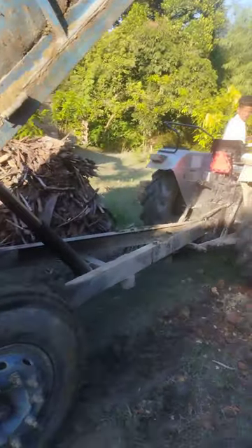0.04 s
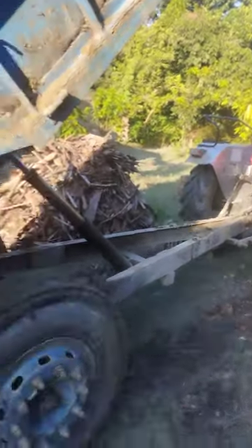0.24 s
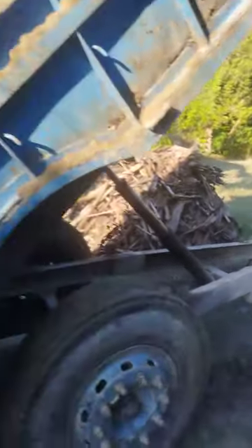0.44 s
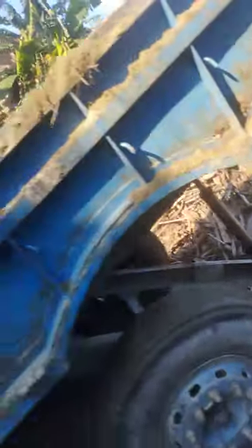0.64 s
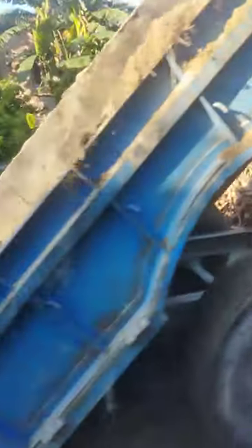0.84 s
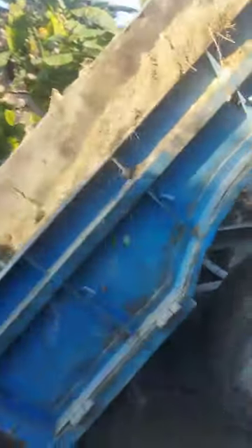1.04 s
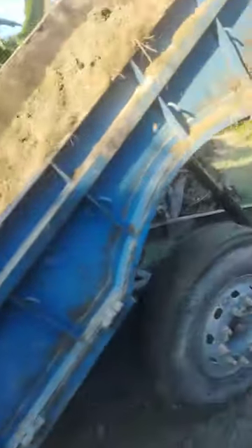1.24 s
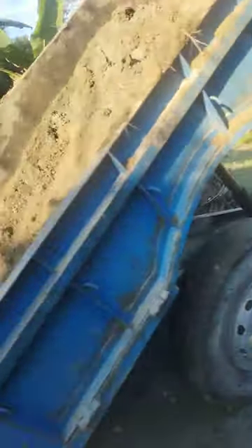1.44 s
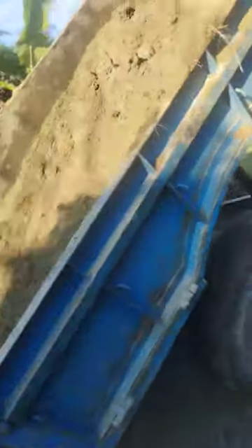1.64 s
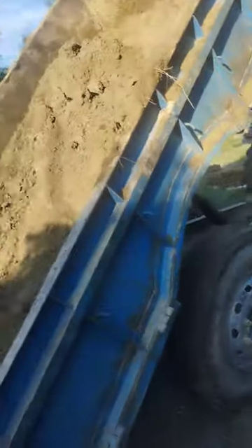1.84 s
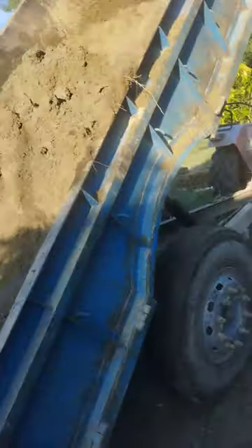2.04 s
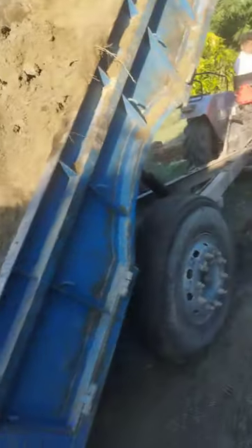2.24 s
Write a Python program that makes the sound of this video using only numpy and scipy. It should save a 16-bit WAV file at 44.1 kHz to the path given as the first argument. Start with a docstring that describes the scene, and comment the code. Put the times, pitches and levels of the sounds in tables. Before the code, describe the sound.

Soil slides down a tipped steel trailer, close by outdoors. Wind buffets the microphone at 0.3 and 0.5 seconds. At 0.6 the load lets go with a thud and a gritty rumble, clods thumping the bed until about 1.2. The steel groans briefly near 1.1. A faint trickle follows, with a short scrape around 1.9, while a diesel tractor chugs from 0.7 and slows toward the end at 2.4.

```python
"""Outdoors, close to a tipped steel trailer, with the microphone open to the wind.
Air buffets the microphone twice; then the load of soil lets go with a thud and a gritty rush,
and clods burst on the ringing bed. The steel body groans under the moving mass.
A trickle of earth and one short scrape remain over the chug of the tractor's diesel,
which slows as it winds down to idle."""
import sys
import numpy as np
from scipy import signal
from scipy.fft import rfft, irfft
from scipy.io import wavfile

SR = 44100
rng = np.random.default_rng(int(sys.argv[2]) if len(sys.argv) > 2 else 0)


def wav_record(signal):
    """Record a signal, one row per channel, as 16-bit PCM in the file named by sys.argv[1]."""
    frames = np.transpose(np.atleast_2d(signal))
    bounded = np.clip(frames, -1, 1)
    # unit amplitude maps onto the largest positive 16-bit level
    quanta = np.round(bounded * 32767).astype(np.int16)
    wavfile.write(sys.argv[1], SR, quanta)


N = 105840
T = np.arange(N) / SR


def amp(db):
    """Decibels to gain."""
    return 10 ** (np.asarray(db) / 20)


def unit(x):
    """Scales to rms 1."""
    return x / np.sqrt(np.mean(x ** 2) + 1e-20)


def level(rows, column=1):
    """Gain over time from rows that hold a time in seconds, then levels in dB."""
    rows = np.array(rows)
    return amp(np.interp(T, rows[:, 0], rows[:, column]))


def colour(x, spectrum):
    """Filters x by rows of frequency in Hz and gain in dB; comes out at rms 1."""
    hz, db = np.transpose(spectrum)
    gain = amp(np.interp(np.log(np.fft.rfftfreq(N, 1 / SR) + 1), np.log(hz + 1), db))
    return unit(irfft(rfft(x) * gain, N))


def noise(spectrum):
    """Smooth noise with the given spectrum."""
    return colour(rng.standard_normal(N), spectrum)


def drift(rate_hz):
    """Random motion mostly slower than rate_hz, at rms 1."""
    lowpass = np.exp(-(np.fft.rfftfreq(N, 1 / SR) / rate_hz) ** 2)
    return unit(irfft(rfft(rng.standard_normal(N)) * lowpass, N))


def grains(spectrum, per_s, spread_db):
    """Countless small impacts of uneven size."""
    size = amp(spread_db * np.minimum(rng.exponential(1, N), 4)) * rng.choice([-1, 1], N)
    return colour(size * (rng.random(N) < per_s / SR), spectrum)


def tone(hz):
    """A sine that follows a moving pitch."""
    return np.sin(2 * np.pi * np.cumsum(hz) / SR)


def bell(at, width):
    """A smooth swell around a moment; width is its half length in seconds."""
    return np.exp(-((T - at) / width) ** 2)


def blow(at, rise, decay):
    """A quick rise and an exponential fall, all times in seconds."""
    return np.clip((T - at) / rise + .5, 0, 1) * np.exp(-np.maximum(T - at - rise, 0) / decay)


def ambience():
    """Quiet outdoor air with faint wavering machine tones."""
    # Open air. Each row: frequency in Hz, relative level in dB.
    air_spectrum = [(120, -32), (200, 3.5), (236, -4.5), (408, -7), (832, -12.5), (964, -22), (1080, -19),
                    (1440, -14.5), (2730, -24), (15800, -27)]
    # Machine tones. Each row: pitch in Hz, level in dB.
    hum_tones = [(440, -77), (975, -79), (1480, -79.5)]
    hums = sum(amp(db) * tone(hz * (1 + .03 * drift(rate_hz=150))) for hz, db in hum_tones)
    return amp(-66) * noise(air_spectrum) + hums


def wind():
    """Air on the microphone: slow swells, and buffets of suction, flutter, rebound and backwash."""
    # Swells, flutter and overload crackle. Each row: frequency in Hz, relative level in dB.
    swell_spectrum = [(3, -17.5), (9, 5), (20, -4), (40, -13), (80, -31.5), (160, -47.5), (400, -71.5),
                      (1500, -80.5), (16000, -105)]
    flutter_spectrum = [(30, -1), (150, 2), (260, 5), (400, -2), (600, -6.5), (800, -21), (1000, -19.5),
                        (1500, -24), (3000, -42.5), (7000, -53), (16000, -49.5)]
    crackle_spectrum = [(100, -8.5), (250, 4.5), (500, 8.5), (1200, -2), (2000, -22.5), (4000, -30.5),
                        (8000, -39.5), (16000, -44.5)]
    # Wind strength. Each row: time in seconds, level in dB.
    swell_level = [(0, -23), (.15, -27), (.28, -18.5), (.4, -20.5), (.49, -16.5), (.58, -23), (.9, -34),
                   (1.1, -50.5), (2.4, -40)]
    # Each row: time in seconds, suction in dB, its half width in seconds, rebound in dB,
    # its length in seconds, flutter in dB, backwash in dB.
    buffets = [(0.3155, 0.1, .002, -1.5, 0.045, -21, -9), (0.5362, 3, 0.00342, -2.5, 0.032, -32, -23)]
    # The microphone crackles as it overloads. Each row: time in seconds, level in dB.
    crackles = [(0.3202, -38.5), (.533, -27.5), (0.5369, -28), (0.544, -24.5)]
    rebound_delay_s = 0.0035
    out = noise(swell_spectrum) * level(swell_level)
    flutter = noise(flutter_spectrum)
    for at, suction_db, width, rebound_db, length, flutter_db, backwash_db in buffets:
        out *= 1 - bell(at + length / 2, length)  # the swells give way to the buffet
        out -= amp(suction_db) / (1 + ((T - at) / width) ** 2)
        rebound_at = at + rebound_delay_s + length / 2
        out += amp(rebound_db) * np.exp(-abs((T - rebound_at) / (0.372 * length)) ** 3)
        out -= amp(backwash_db) * bell(at + 2 * length, 0.9 * length)
        out += amp(flutter_db) * flutter * blow(at, rise=0.0029, decay=0.0093)
    return out + noise(crackle_spectrum) * sum(amp(db) * bell(at, 0.0015) for at, db in crackles)


def thuds():
    """Heavy lumps and smaller puffs give low, heavily damped thumps."""
    # Each row: time in seconds, peak in dB, pitch in Hz, half length in seconds.
    thumps = [(0.487, -8.5, 54.2, 0.0072), (0.508, -9.5, 30, 0.0096), (0.6528, -1.5, 128, 0.0048),
              (0.693, -13, 83.6, 0.0053), (0.726, -7, 120, 0.0029), (0.774, -18.5, 49, 0.02),
              (0.811, -9, 70, 0.01), (0.863, -14.5, 55, 0.0056), (0.908, -12, 50.5, .011),
              (.954, -14, 55, .012), (1.042, -16.5, 86, 0.014), (1.176, -17.5, 75.6, 0.0063)]
    return sum(amp(db) * bell(at, length) * np.cos(2 * np.pi * hz * (T - at))
               for at, db, hz, length in thumps)


def steel(x):
    """The bed's panel modes colour whatever rubs or strikes it; comes out at rms 1."""
    # Each row: mode frequency in Hz, gain in dB.
    panel_modes = [(189, 6), (376, 4.5), (452, 4.5), (646, 6), (717, 5), (819, 5.5), (956, 9.5), (1160, 0),
                   (1294, 5), (1421, 5.5), (1520, 0), (1750, 6.5), (1897, 10), (2007, -0.5)]
    width_hz = 11
    hz = np.fft.rfftfreq(N, 1 / SR)
    ring = 1 + sum((amp(db) - 1) / (1 + 2j * (hz - mode_hz) / width_hz) for mode_hz, db in panel_modes)
    return unit(irfft(rfft(x) * ring, N))


def soil():
    """The mass creeps, then heaves and rumbles on the bed while grains rush over it in clumps."""
    # The layers of the slide. Each row: frequency in Hz, relative level in dB.
    creep_spectrum = [(60, -8), (130, 4.5), (250, 0.5), (400, -10.5), (1000, -20.5), (2000, -34.5),
                      (5000, -50.5), (16000, -84.5)]
    heave_spectrum = [(15, -34.5), (30, -7), (41, 0.5), (58, -8), (80, -9), (110, -23.5), (300, -56),
                      (2000, -100)]
    rumble_spectrum = [(20, -22), (40, -9), (80, -3), (125, 4), (170, -7), (220, -10.5), (300, -16),
                       (450, -26.5), (900, -67)]
    rush_spectrum = [(120, -28), (200, -3.5), (258, -3), (296, -9), (362, -4), (507, -8.5), (1090, -16),
                     (1340, -17), (2290, -24.5), (3080, -40.5), (4250, -51.5), (5000, -69), (6500, -88),
                     (11000, -120)]
    grit_spectrum = [(800, -38), (2000, 1), (3000, -2.5), (4200, -7), (5200, -17), (8000, -20.5),
                     (12000, -22.5), (16000, -14)]
    # The sliding load. Each row: time in seconds, then relative levels of rumble, rush and grit in dB.
    slide = [(0.6, -34, -52, -82.5), (0.608, -35, -55.5, -82), (0.648, -17, -30, -41),
             (0.752, -23, -32.5, -56.5), (0.88, -30.5, -35, -53), (1.014, -24.5, -34.5, -57.5),
             (1.142, -37.5, -42.5, -64), (1.176, -32.5, -38, -55.5), (1.21, -39.5, -44.5, -60),
             (1.812, -48, -47.5, -64.5), (1.862, -42.5, -46.5, -61.5), (1.92, -47, -47.5, -67.5),
             (2.226, -44.5, -50, -68), (2.37, -59, -50, -68)]
    # The rumble thins once the heavy mass has left. Each row: time in seconds, gain in dB.
    emptying = [(.95, -4), (1.15, -1.5), (1.5, -3.5), (2.4, -7.5)]
    clumps = drift(rate_hz=70)
    heave = noise(heave_spectrum) * amp(-20.5) * bell(at=0.796, width=0.19)
    rumble = noise(rumble_spectrum) * level(slide, column=1) * level(emptying) * amp(3)
    rush = steel(grains(rush_spectrum, per_s=5000, spread_db=3))
    rush *= level(slide, column=2) * amp(1.7 * clumps)
    grit = grains(grit_spectrum, per_s=5000, spread_db=3)
    grit *= level(slide, column=3) * amp(-1 + 0.63 * clumps)
    creep = steel(noise(creep_spectrum)) * amp(-41) * bell(at=0.551, width=0.084)
    release_s, rise_s = .62, 0.0031
    release = np.clip((T - release_s) / rise_s, 0, 1)
    return creep + (heave + rumble + rush + grit) * release


def clods():
    """Clods and stones strike the steel and throw a spray of crumbs."""
    # Each row: start in seconds, level in dB, decay in seconds, spray level in dB.
    strikes = [(0.625, -50, .01, -72), (0.65, -33.5, 0.0052, -43), (.714, -35, 0.017, -56.5),
               (.762, -35, 0.01, -53.5), (.811, -28.5, .011, -56), (.857, -36, 0.033, -57),
               (0.902, -35, 0.013, -56), (0.938, -26.5, 0.025, -57.5), (0.994, -30.5, 0.022, -68),
               (1.145, -54, 0.0017, -54), (1.166, -48, 0.014, -70), (2.246, -52, 0.0033, -72)]
    # The burst and its crumbs. Each row: frequency in Hz, relative level in dB.
    burst_spectrum = [(100, -14), (400, 10), (900, 8.5), (1900, -3), (2800, -10.5), (4300, -16),
                      (5500, -32), (9000, -46), (16000, -47)]
    spray_spectrum = [(1500, -14), (4000, 12.5), (7000, 7.5), (9500, 5), (12500, 7), (16000, 9.5)]
    burst = steel(grains(burst_spectrum, per_s=6000, spread_db=3))
    spray = grains(spray_spectrum, per_s=11000, spread_db=-3)
    out = np.zeros(N)
    for at, db, decay, spray_db in strikes:
        out += amp(db) * burst * blow(at, rise=0.0024, decay=decay)
        out += amp(spray_db) * spray * blow(at, rise=min(0.012, decay / 2), decay=decay)
    return out


def engine():
    """Each diesel firing booms in the exhaust, rattles the block and knocks; the gears whine down."""
    # Block clatter, knock and exhaust drone. Each row: frequency in Hz, relative level in dB.
    clatter_spectrum = [(71, -38), (120, 12), (235, 3), (272, -4), (390, -5.5), (482, -5), (532, -19),
                        (607, -2), (1250, -26.5), (1540, -8.5), (2440, -23.5), (2780, -43), (6000, -44),
                        (7800, -80.5), (13200, -120)]
    knock_spectrum = [(500, -37), (1000, 8), (1600, -1), (2500, 2), (2900, -16.5), (4400, -21), (6000, -36),
                      (16000, -34)]
    drone_spectrum = [(30, -23.5), (55, -2.5), (70, 2.5), (95, -1.5), (130, -24), (250, -26.5),
                      (1000, -72.5)]
    # As the engine slows, the knock grows and the drone thins. Each row: time in seconds, level in dB.
    chug_level = [(.55, -57.5), (.75, -20), (1.05, -28.5), (1.3, -20.5), (1.5, -28.5), (1.74, -22.5),
                  (1.88, -26), (2.1, -28), (2.4, -29)]
    knock_level = [(.55, -92), (1.2, -65), (1.8, -65), (2.05, -52), (2.4, -49)]
    drone_level = [(.6, -63.5), (1.1, -33.5), (1.35, -38), (1.6, -39.5), (1.9, -39.5), (2.4, -64)]
    # Gear whine at its loudest. Each row: pitch in Hz, level in dB.
    whines = [(1943, -58.5), (1440, -52)]
    firing_at_s, firings_per_s, slowing_per_s2 = 1.73, 17.45, 6.5  # one firing, the rate there, its fall
    exhaust_hz, rise_s, ring_s, lead_s = 63.7, 0.011, 0.019, 0.0009
    whine_at_s, sag_per_s = 1.29, 0.53
    since = T - firing_at_s
    firing_count = firings_per_s * since - slowing_per_s2 * since ** 2 / 2
    firing_times = T[1:][np.diff(np.floor(firing_count)) > 0]
    boom, rattle, knock = np.zeros((3, N))
    for at in firing_times:
        age = T - at
        ring = np.where(age < 0, bell(at, rise_s), np.exp(-(abs(age) / ring_s) ** 1.56))
        strength = amp(0.2 * rng.standard_normal())
        boom += strength * ring * np.cos(2 * np.pi * exhaust_hz * (age + lead_s))
        rattle += blow(at + 0.006, rise=0.0078, decay=0.019)
        knock += bell(at + .013, width=0.01)
    clatter = amp(-25) * rattle * grains(clatter_spectrum, per_s=4000, spread_db=5)
    out = (boom + clatter) * level(chug_level)
    out += knock * grains(knock_spectrum, per_s=5700, spread_db=-0.5) * level(knock_level)
    out += noise(drone_spectrum) * level(drone_level)
    for hz, db in whines:
        pitch = hz * (1 - sag_per_s * (T - whine_at_s) + 0.0095 * drift(rate_hz=166))
        out += amp(db) * bell(whine_at_s, width=0.13) * tone(pitch)
    return out


def trailer():
    """The steel body groans and scrapes under the moving load."""
    # Each row: time in seconds, level in dB, pitch in Hz, half length in seconds, glide in Hz a second.
    groans = [(1.077, -31.5, 544, 0.019, 1801.5), (1.04, -33, 450.3, 0.027, -0.5),
              (1.072, -49, 2475, 0.012, 4), (1.741, -50, 1543, 0.011, 0.5), (1.788, -47, 1003, 0.026, 1799),
              (1.984, -55.5, 1480, 0.15, 17)]
    # Each row: time in seconds, dull part in dB, half length in seconds, bright edge in dB.
    scrapes = [(1.854, -54, 0.0093, -48.5), (1.881, -44.5, 0.029, -60)]
    # The two parts of a scrape. Each row: frequency in Hz, relative level in dB.
    dull_spectrum = [(300, -1), (1100, 4), (1500, 3), (2600, -14), (4400, -24), (16000, -49)]
    edge_spectrum = [(1200, -20), (2000, 2.5), (2600, 4), (3100, -16), (4400, -13), (6000, -25),
                     (16000, -37)]
    dull = grains(dull_spectrum, per_s=5200, spread_db=3.5)
    edge = grains(edge_spectrum, per_s=18000, spread_db=6)
    out = sum(bell(at, length) * (amp(dull_db) * dull + amp(edge_db) * edge)
              for at, dull_db, length, edge_db in scrapes)
    for at, db, hz, length, glide in groans:
        pitch = (hz + glide * (T - at)) * (1 + 0.0217 * drift(rate_hz=170))
        out += amp(db) * bell(at, length) * tone(pitch)
    return out


def scene():
    """All sources meet at one microphone in the open air."""
    return (wind() + thuds() + soil() + clods() + trailer() + engine() + ambience())[None]


def record(dry):
    """The strongest buffet overloads the microphone; the highest treble is cut off."""
    cutoff_hz = 15900
    clipped = np.clip(dry, -1, 1)
    lowpass = signal.firwin(511, cutoff_hz, window=("kaiser", 9), fs=SR)
    return signal.oaconvolve(clipped, lowpass[None], "same")


dry = scene()
out = record(dry)
wav_record(out)
```